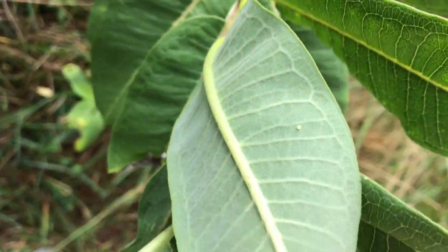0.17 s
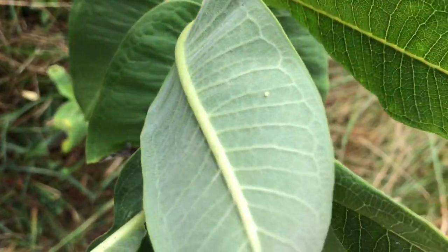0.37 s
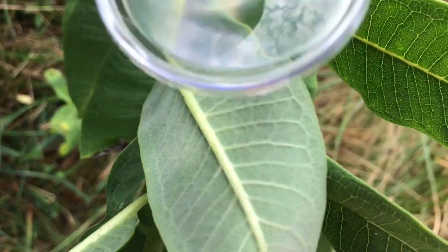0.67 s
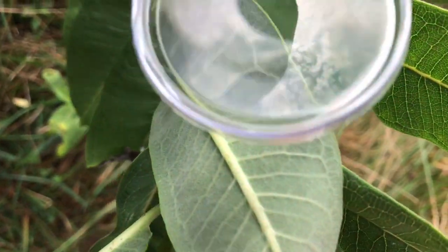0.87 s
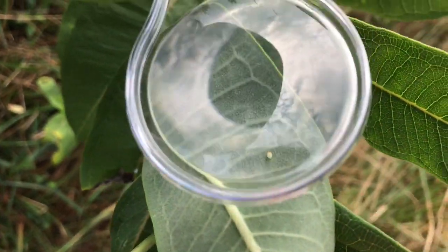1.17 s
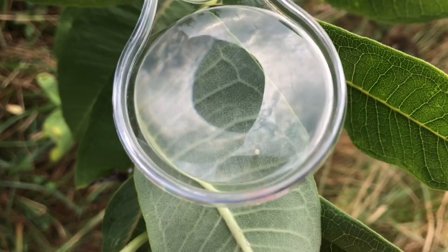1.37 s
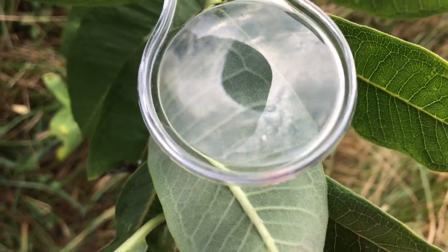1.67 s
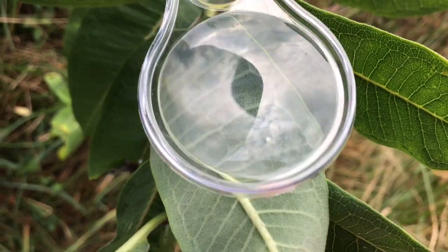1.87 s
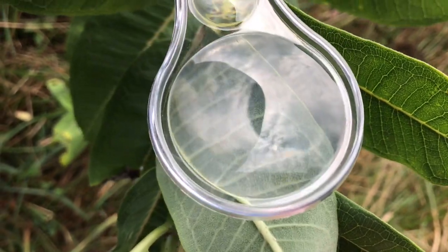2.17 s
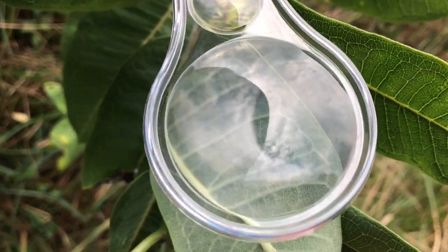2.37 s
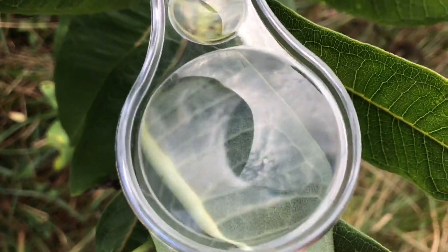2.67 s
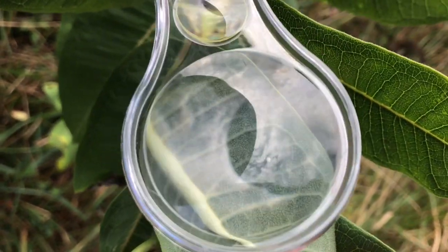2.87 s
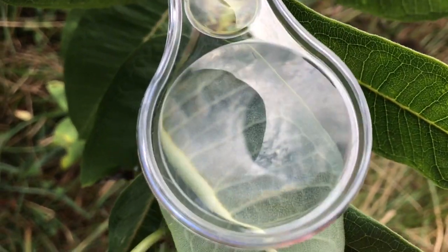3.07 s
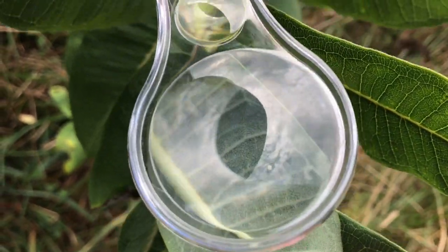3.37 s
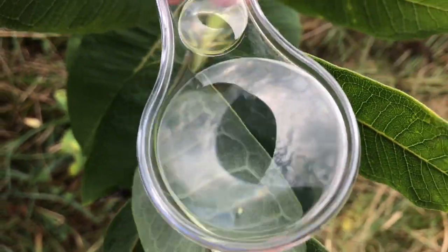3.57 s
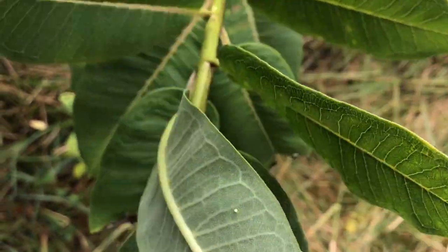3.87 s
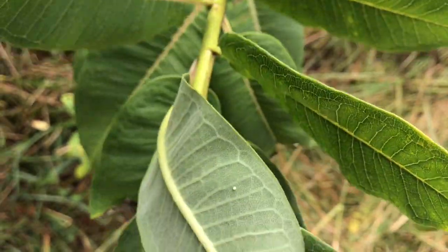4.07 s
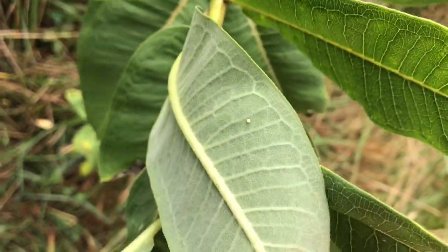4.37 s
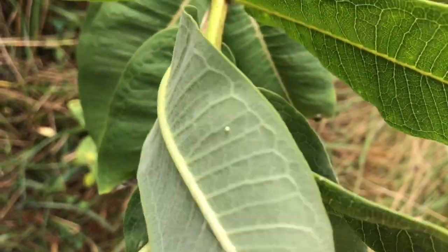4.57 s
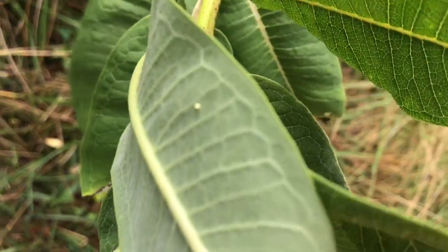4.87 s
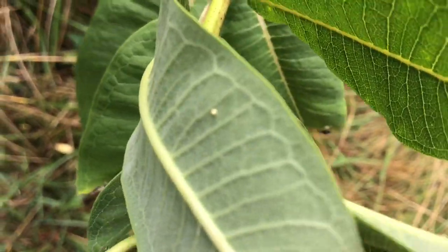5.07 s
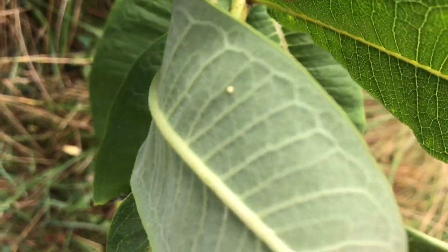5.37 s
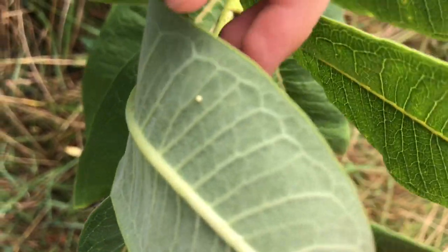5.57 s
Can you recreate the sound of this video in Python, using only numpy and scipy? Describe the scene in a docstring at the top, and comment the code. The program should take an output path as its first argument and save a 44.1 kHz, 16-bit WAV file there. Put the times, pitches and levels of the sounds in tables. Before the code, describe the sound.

Throughout, a distant engine throbs in a low rumble under a soft open-air hush, while crickets trill and chirp at a high pitch over a far insect chorus. A small bird gives thin rising chips every half second to a second, with a few very faint far whistles. Close to the microphone, a plant makes several dry ticks between 0.2 and 0.4 seconds. A plastic magnifier knocks softly with a snap at about 1.1 seconds, and a dull, low handling thump follows at 1.6. Its rim scrapes faintly over a leaf around 2.5 and 3.5 seconds. The engine grows slightly stronger from 3 seconds, and single ticks come near 3.8 and 4.2. The chirping stops by about 5 seconds while the trill continues. From 5 to 5.6 seconds, fingers rub and flex the leaf in short raspy rustles, sharpest at 5.3, with ticks and soft nudges on the stalk.

```python
"""A summer field: a distant engine throbs in the low rumble and hush of the open air. Ground crickets
trill and chirp by stridulation over a far insect chorus, and a small bird calls in thin rising chips
above a few far whistles. Close by, a hand holds a plastic magnifier over a leaf: soft blows ring the
damped modes of the magnifier, a camera case and the stalk, the plant ticks, and stick-slip friction
sounds as fingers rub and turn the leaf."""
import sys
import numpy as np
from scipy import signal
from scipy.fft import rfft, irfft, next_fast_len
from scipy.io import wavfile
from scipy.ndimage import map_coordinates

SR = 44100
rng = np.random.default_rng(int(sys.argv[2]) if len(sys.argv) > 2 else 0)


def unload_audio(sound):
    """Save the sound as a 16-bit wav file, at the path given as the first command line argument."""
    columns = np.transpose(np.atleast_2d(sound))
    # keep every value between -1 and 1, then stretch to whole-number steps
    steps = np.round(np.clip(columns, -1, 1) * 32767)
    wavfile.write(sys.argv[1], SR, steps.astype(np.int16))


N = 251811


def amp(db):
    """Amplitude grows tenfold for every 20 dB."""
    return 10 ** (np.asarray(db) / 20)


def unit(x):
    """Normalisation to an rms of 1."""
    return x / np.sqrt(np.mean(x ** 2) + 1e-20)


def clock():
    """Uniform sampling: the time of each sample in seconds."""
    return np.arange(N) / SR


def curves(rows):
    """Linear interpolation: one value per sample for each column after the time."""
    times, *columns = np.transpose(rows)
    return [np.interp(clock(), times, column) for column in columns]


def wobble(knots_per_s):
    """Smooth random modulation: a spline through Gaussian values."""
    knots = rng.standard_normal(int(N * knots_per_s / SR) + 4)
    return map_coordinates(knots, [clock() * knots_per_s], mode="nearest")


def filtered(x, response):
    """Linear filtering: the spectrum of x is multiplied by a frequency response."""
    size = next_fast_len(N + 8192)
    return irfft(rfft(x, size) * response(np.fft.rfftfreq(size, 1 / SR)), size)[:N]


def coloured(x, spectrum):
    """Spectral shaping by (frequency_hz, gain_db) points joined on a logarithmic frequency axis."""
    points_hz, db = np.transpose(spectrum)
    log_hz = np.log(points_hz)
    return filtered(x, lambda hz: amp(np.interp(np.log(hz + 1), log_hz, db, left=-120, right=-120)))


def noise(spectrum):
    """Filtered white noise with an rms of 1."""
    return unit(coloured(rng.standard_normal(N), spectrum))


def cycles(hz):
    """Phase is the integral of frequency: counted in cycles, from a random start."""
    return np.cumsum(hz * np.ones(N)) / SR + rng.random()


def gate(start_s, length_s, edge_s):
    """A trapezoidal envelope, at half height at its start and end."""
    age = clock() - start_s
    return np.clip(np.minimum(age, length_s - age) / edge_s + .5, 0, 1)


# Running of the engine: time_s, firing_rate_hz, gain_db
ENGINE_RUN = [(0, 19.8, -4), (1.8, 19.9, -6), (3, 20.4, -0.5), (4.6, 20.35, 2), (5.7, 20, 2.5)]
# A low hum near 55 Hz, then harmonics of the firing rate, before that gain: frequency_ratio, level_db
ENGINE_TONES = [(2.72, -53), (5, -57.5), (7, -63.5), (8, -63), (9, -67.5), (10, -66), (11, -69.5),
                (12, -70), (13, -74)]
# Swell of the low rumble: time_s, level_db
RUMBLE_LEVELS = [(0, -57), (.45, -51.5), (1.0, -57.5), (2.1, -51), (3.6, -52.5), (4.5, -51), (5.7, -51.5)]
# Spectrum of the rumble: frequency_hz, gain_db
RUMBLE_SPECTRUM = [(20, -43), (27, -15), (38, -4), (62, 0.5), (105, -7), (128, -9.5), (208, -15.5),
                   (260, -19.5), (305, -26.5), (420, -35), (700, -64)]
# Spectrum of the open-air hush: frequency_hz, gain_db
HUSH_SPECTRUM = [(200, 0), (400, 0), (620, -1), (780, 0), (1020, 0), (1500, -8.5), (2200, -10.5),
                 (4500, -10), (8000, -15), (10300, -22), (12500, -25.5), (15900, -18)]

def distant_engine():
    """A low engine hum near 55 Hz, plus harmonics of the firing rate, in broadband rumble and hush."""
    rumble_db, = curves(RUMBLE_LEVELS)
    firing_hz, engine_db = curves(ENGINE_RUN)
    firings = cycles(firing_hz * (1 + 0.00398 * wobble(3)))
    throb = sum(amp(db + 2.2 * wobble(2.934)) * np.sin(2 * np.pi * (ratio * firings + rng.random()))
                for ratio, db in ENGINE_TONES)
    rumble = amp(rumble_db + 1.53 * wobble(5.5)) * noise(RUMBLE_SPECTRUM)
    hush = amp(-68 + 0.25 * engine_db + 0.37 * wobble(4.07)) * noise(HUSH_SPECTRUM)
    return amp(engine_db) * throb + rumble + hush


# Spectrum of the far insects: frequency_hz, gain_db
CHORUS_SPECTRUM = [(4700, -29), (5150, -8), (6000, -4.5), (6500, -2.5), (7100, 2.5), (7550, -6),
                   (8000, -13.5), (8500, -21.5), (10500, -27.5), (12000, -20), (12450, -13.5), (13000, -24),
                   (14100, -18), (15000, -21)]

def insect_chorus():
    """Incoherent summation: countless far insects merge into a shimmering band of noise."""
    return amp(-61.5 + 1.2 * wobble(3.48) + .7 * wobble(60)) * noise(CHORUS_SPECTRUM)


def stridulate(hz, strokes_per_s, fall, arch, duty, scatter, overtone_db):
    """Stridulation: each wing stroke sounds a tone that arches and falls; grass scatters its phase."""
    stroke_count = cycles(strokes_per_s * (1 + .002 * wobble(5)))
    progress = np.minimum(stroke_count % 1 / duty, 1)
    swell = np.sin(np.pi * progress)
    pitch_hz = hz * (1 - fall * (progress - .5) + arch * (swell - np.pi / 4) + scatter * wobble(900))
    phase = 2 * np.pi * cycles(pitch_hz)
    tone = np.sin(phase) + amp(overtone_db) * np.sin(2 * phase)
    return unit(np.sqrt(np.abs(swell)) * amp(wobble(40)) * tone)


# The nearest trilling cricket: time_s, pitch_hz, strokes_per_s, level_db
NEAR_TRILL = [(0, 7130, 51, -65), (1.5, 7120, 59, -64), (3.3, 7130, 47, -63), (4.0, 7296, 41, -63),
              (5.0, 7270, 52, -63.5), (5.7, 7500, 47.4, -59.5)]
# Trilling crickets further off: pitch_hz, strokes_per_s, pitch_fall_fraction, level_db
FAR_TRILLS = [(7970, 49.7, .03, -78.5), (5920, 33.3, 0.14, -71.5), (6080, 51, .04, -72),
              (5440, 73, .06, -88), (6770, 91, 0.084, -79.5)]

def trilling_crickets():
    """Continuous stridulation: an unbroken train of wing strokes is heard as a trill."""
    hz, rate, db = curves(NEAR_TRILL)
    effort = (hz / hz[0]) ** 10  # harder strokes sound higher and arch further
    near = stridulate(hz, rate, fall=.012 * effort, arch=.045 * effort,
                      duty=.72, scatter=.008, overtone_db=-25)
    out = amp(db) * near
    for hz, rate, fall, db in FAR_TRILLS:
        gain = amp(db + wobble(2.8))
        out += gain * stridulate(hz, rate, fall, arch=.01, duty=.6, scatter=.013, overtone_db=-21)
    return out


# Two chirping crickets: first_peak_s, period_s, stop_s, pitch_hz, strokes_per_s, level_db
CHIRP_TRAINS = [(0.26, .437, 4.4, 6740, 96, -58), (0.15, .471, 5.1, 6550, 72, -61.5)]

def chirping_crickets(chirp_s=0.12):
    """Amplitude modulation: a slow periodic envelope groups the wing strokes into chirps."""
    out = np.zeros(N)
    for first_s, period_s, stop_s, hz, rate, db in CHIRP_TRAINS:
        from_peak_s = (clock() - first_s + period_s / 2) % period_s - period_s / 2
        envelope = np.exp(-(2 * from_peak_s / chirp_s) ** 4) * (clock() < stop_s)
        gain = amp(db + wobble(2.88))
        wings = stridulate(hz, rate, fall=0.017, arch=0.012, duty=.65, scatter=0.0089, overtone_db=-21.5)
        out += gain * envelope * wings
    return out


# Whistles of far birds: start_s, length_s, pitch_hz, level_db
FAR_WHISTLES = [(0, 0.053, 3280, -76), (0.995, 0.23, 2720, -77), (2.812, 0.015, 2870, -63.5),
                (4.862, 0.1, 2586, -65.5)]

def far_birds(flutter_db=2.5, blur_fraction=.05):
    """Random frequency modulation: each far whistle arrives blurred into a narrow band."""
    out = np.zeros(N)
    for start_s, length_s, hz, db in FAR_WHISTLES:
        envelope = amp(db + flutter_db * wobble(200)) * gate(start_s, length_s, 0.01)
        pitch_hz = hz * (1 + blur_fraction * wobble(500))
        out += envelope * np.sin(2 * np.pi * cycles(pitch_hz))
    return out


# Chips of the small bird: start_s, top_pitch_hz, length_s, level_db, rise_boost_db
BIRD_CHIPS = [(0.215, 7140, 0.042, -47.5, 1), (1.226, 7330, 0.03, -46, 7), (1.796, 7130, 0.045, -52, 5),
              (2.6, 7010, 0.036, -44.5, 2.5), (3.24, 7210, 0.039, -45, 0), (3.656, 7060, 0.028, -47.5, -1),
              (4.214, 7070, 0.041, -46.5, 2), (5.368, 7140, 0.026, -57, 6)]

def small_bird(rise_s=0.0069, depth_fraction=.37, flutter_db=2.5):
    """A frequency sweep: each chip shoots up to its top pitch and holds it."""
    out = np.zeros(N)
    for start_s, top_hz, length_s, db, boost_db in BIRD_CHIPS:
        age = np.maximum(clock() - start_s, 0)
        rise_left = np.exp(-(age / rise_s) ** 1.37)
        rising = np.sqrt(rise_left)
        phase = 2 * np.pi * cycles(top_hz * (1 - depth_fraction * rise_left + .009 * wobble(400)))
        overtone = amp(-16) * rising * np.sin(2 * phase)  # only the quick rise is edgy
        gain = amp(db + boost_db * rising + flutter_db * wobble(160))
        out += gain * gate(start_s + 0.0034, length_s - .006, 0.0035) * (np.sin(phase) + overtone)
    return out


def foliage(direct, tail_db=-6, t60_s=.15):
    """Multiple scattering: leaves all round add a short, exponentially decaying tail."""
    t = np.arange(SR // 4) / SR
    tail = rng.standard_normal(len(t)) * amp(-60 * t / t60_s)
    return direct + amp(tail_db) * signal.fftconvolve(direct, tail / np.linalg.norm(tail))[:N]


def struck(blows, modes, attack_s):
    """Modal vibration: each soft blow excites a sum of exponentially damped sinusoids."""
    out = np.zeros(N + SR)
    t = np.arange(SR // 2) / SR
    for start_s, db in blows:
        ring = sum(amp(gain_db + rng.normal(0, 1) - 60 * t / t60_s) * np.sin(2 * np.pi * hz * t)
                   for hz, gain_db, t60_s in modes)
        out[round(start_s * SR):][:len(t)] += amp(db) * ring * (1 - np.exp(-t / attack_s))
    return out[:N]


# The magnifier is bumped: start_s, strength_db
MAGNIFIER_KNOCKS = [(1.026, -48.5), (1.0938, -33), (1.1078, -38)]
# Modes of its plastic: frequency_hz, gain_db, t60_s
MAGNIFIER_MODES = [(397, 0, 0.019), (590, 2.5, 0.019), (904, -9.5, 0.024)]
# The hand shifts on the camera case: start_s, strength_db
CASE_THUMPS = [(1.535, -41), (1.583, -28.5)]
# Modes of the case: frequency_hz, gain_db, t60_s
CASE_MODES = [(69, -3, 0.19), (103, 6, 0.072), (168, -1.5, 0.061), (289, -12.5, 0.078)]
# Fingers nudge the stalk: start_s, strength_db
STALK_NUDGES = [(5.471, -39), (5.483, -45), (5.557, -47)]
# Modes of the stalk: frequency_hz, gain_db, t60_s
STALK_MODES = [(261, -0.5, 0.047), (325, -1, 0.051)]

def handling_bumps():
    """Impact excitation: each body rings at its natural frequencies; softer contact starts more slowly."""
    magnifier = struck(MAGNIFIER_KNOCKS, MAGNIFIER_MODES, attack_s=0.00037)
    case = struck(CASE_THUMPS, CASE_MODES, attack_s=0.0052)
    stalk = struck(STALK_NUDGES, STALK_MODES, attack_s=0.0014)
    return magnifier + case + stalk


# Snaps of the stalk and leaf edge: start_s, strength_db
PLANT_SNAPS = [(0.2, -34.5), (0.2605, -39.5), (0.32, -36.5), (0.358, -36), (1.1065, -36.5), (3.7847, -46),
               (4.156, -38), (4.9836, -40), (5.436, -39), (5.6117, -38)]
# Spectrum of a snap: frequency_hz, gain_db
SNAP_SPECTRUM = [(300, -4), (900, -1), (1300, -4), (2000, -2.5), (3100, -2), (3600, -11), (4400, -4),
                 (7000, -15), (15000, -23)]

def plant_ticks(t60_s=.011, rise_s=.0015, faint_per_s=1.5, faint_db=-52.5):
    """Brief transients are broadband: the plant gives dry snaps, with fainter ones at random times."""
    faint_times = rng.random(int(faint_per_s * N / SR)) * N / SR
    envelope = np.zeros(N)
    for start_s, db in list(PLANT_SNAPS) + [(s, faint_db) for s in faint_times]:
        age = clock() - start_s
        envelope += amp(db - 60 * np.abs(age - rise_s) / t60_s) * (age > 0)
    return coloured(envelope * rng.standard_normal(N), SNAP_SPECTRUM)


def strokes(rows, edge_fraction=.37):
    """The force envelope of short contacts: each rises, holds and lets go."""
    return sum(amp(db) * gate(start_s, length_s, edge_fraction * length_s) for start_s, length_s, db in rows)


# Fingers slide along the leaf as they turn it: time_s, rubbing_db
FINGER_SLIDE = [(4.2, -82), (4.448, -68), (4.79, -74.5), (4.928, -54.5), (4.94, -67), (4.98, -69),
                (4.986, -63.5), (5.03, -70.5), (5.066, -44.5), (5.094, -59), (5.186, -59.5), (5.238, -69.5),
                (5.3, -47)]
# Fingers press and flex the leaf: start_s, length_s, level_db
LEAF_FLEXES = [(.358, 0.067, -60), (4.42, 0.027, -63), (4.979, 0.049, -57.5), (5.458, 0.039, -50.5),
               (5.498, 0.03, -57.5), (5.543, .025, -53), (5.592, 0.026, -58.5)]
# A fingertip skids off its edge: start_s, length_s, level_db
EDGE_SKIDS = [(5.302, 0.018, -39.5)]
# Light touches stir only its hairs: start_s, length_s, level_db
HAIR_BRUSHES = [(3.503, .02, -60), (3.853, .01, -61.5), (3.97, 0.12, -71), (4.27, .19, -76.5)]
# The rim of the magnifier scrapes over it: start_s, length_s, level_db
RIM_SCRAPES = [(2.44, .11, -73), (2.654, 0.045, -67.5), (3.42, 0.057, -64.5), (3.554, 0.021, -53),
               (3.596, .025, -66)]
# Spectrum of the flexing blade: frequency_hz, gain_db
BLADE_SPECTRUM = [(150, -12), (310, 4), (550, -4), (1000, 1.5), (1900, -3), (2500, -9), (3100, -4.5),
                  (3700, -11)]
# Rasp of the veins: frequency_hz, gain_db
VEIN_SPECTRUM = [(1200, -11), (2500, -16), (3100, -12), (3500, -2), (3900, 2), (4800, -2), (5600, 1.5),
                 (7500, -7.5), (10000, -17)]
# Hiss of the fine hairs: frequency_hz, gain_db
HAIR_SPECTRUM = [(5000, -9), (8500, 2.5), (11000, -2.5), (15900, -2)]
# Spectrum of the scraping rim: frequency_hz, gain_db
RIM_SPECTRUM = [(500, -7.5), (1200, -2.5), (1800, -7.5), (2500, -3.5), (3100, -1.5), (3650, -2), (4300, -8),
                (6000, -16), (12000, -19)]

def rubbed_leaf(slip_db=2.5, slips_per_s=300, middling_rub_db=-60.5):
    """Stick-slip friction: blade, veins, hairs and rim share the slips, and each adds its own grain."""
    rubbing_db, = curves(FINGER_SLIDE)
    harder_db = rubbing_db - middling_rub_db
    start_s, stop_s = FINGER_SLIDE[0][0], FINGER_SLIDE[-1][0]
    touching = gate(start_s, stop_s - start_s, .004)
    flex, skid, brush = strokes(LEAF_FLEXES), strokes(EDGE_SKIDS), strokes(HAIR_BRUSHES)
    # With harder rubbing, the veins grow louder fastest.
    blade = flex + amp(-12.5) * skid + touching * amp(-63.5 + 0.81 * harder_db)
    veins = amp(-5) * flex + skid + touching * amp(-58 + 1.05 * harder_db)
    hairs = amp(-11.5) * flex + amp(-7.5) * skid + brush + touching * amp(-63.5 + 0.77 * harder_db)
    slips = amp(slip_db * wobble(slips_per_s))  # skin catches and lets go
    out = np.zeros(N)
    for force, spectrum in ((blade, BLADE_SPECTRUM), (veins, VEIN_SPECTRUM),
                            (hairs, HAIR_SPECTRUM), (strokes(RIM_SCRAPES), RIM_SPECTRUM)):
        grain = amp(2.34 * wobble(500)) * rng.standard_normal(N)
        out += force * unit(coloured(slips * grain, spectrum))
    return out


def scene():
    """Superposition: the field all round and the handling close by add in one channel."""
    bumps = handling_bumps()
    insects = trilling_crickets() + chirping_crickets() + insect_chorus()
    birds = foliage(small_bird() + far_birds())
    return (insects + birds + distant_engine() + rubbed_leaf() + plant_ticks() + bumps)[None]


def record(dry):
    """Band limiting: an ideal low-pass filter removes the highest treble."""
    cutoff_hz = 15780
    return filtered(dry[0], lambda hz: hz < cutoff_hz)[None]


dry = scene()
out = record(dry)
unload_audio(out)
```